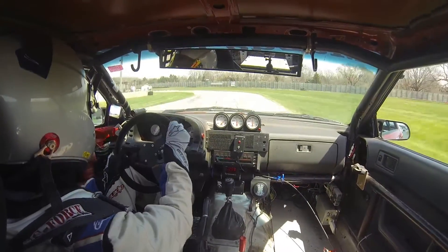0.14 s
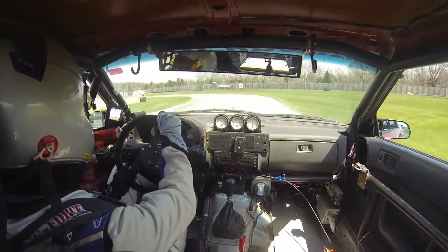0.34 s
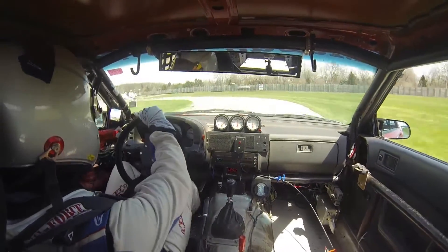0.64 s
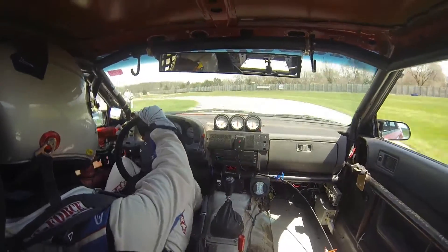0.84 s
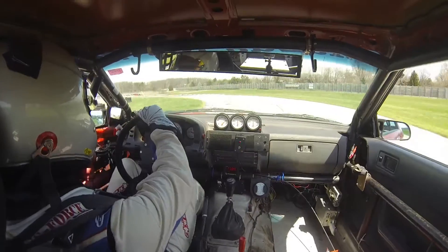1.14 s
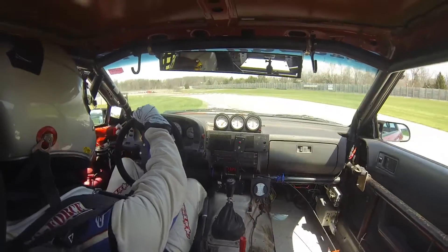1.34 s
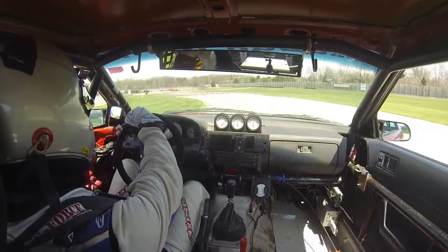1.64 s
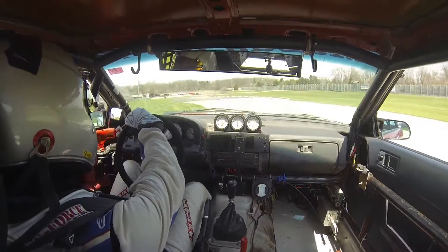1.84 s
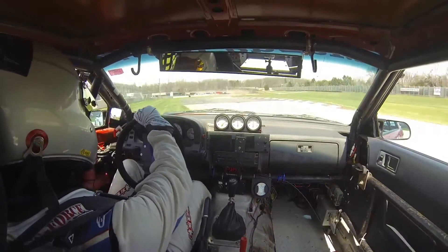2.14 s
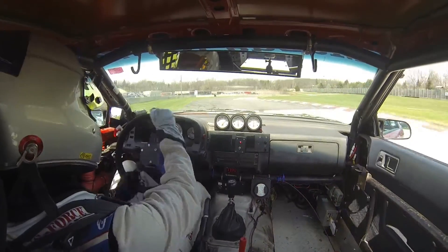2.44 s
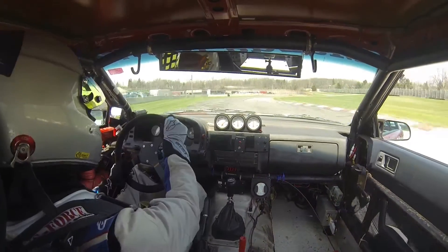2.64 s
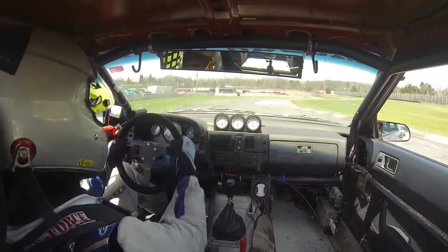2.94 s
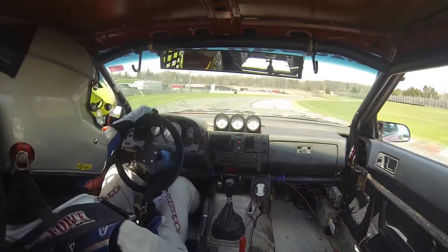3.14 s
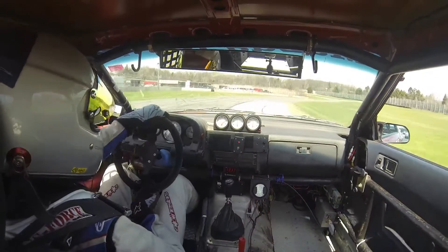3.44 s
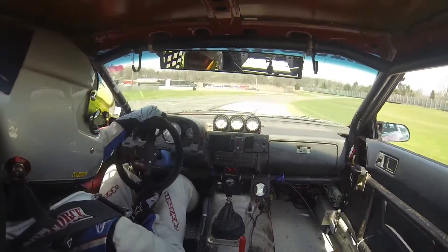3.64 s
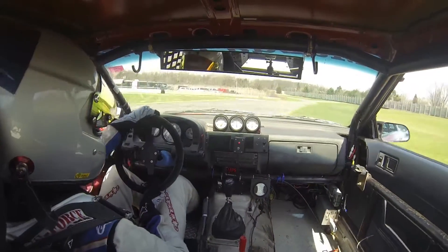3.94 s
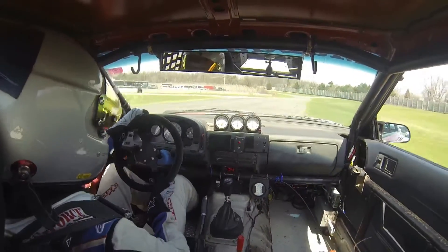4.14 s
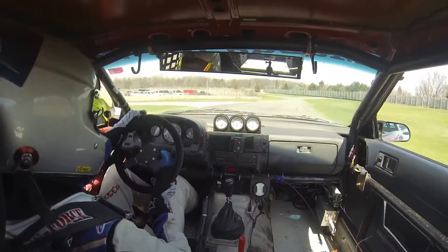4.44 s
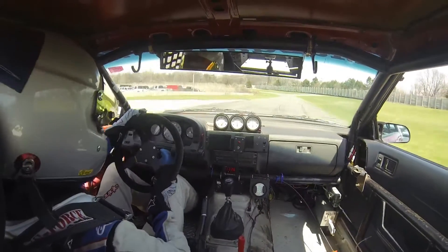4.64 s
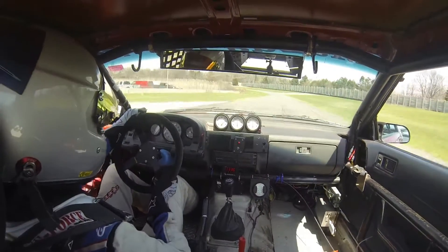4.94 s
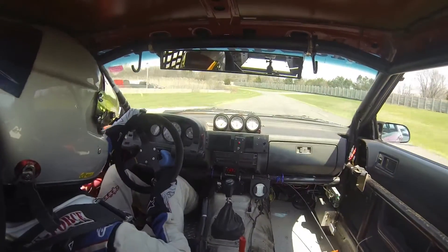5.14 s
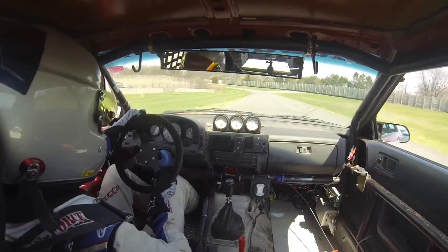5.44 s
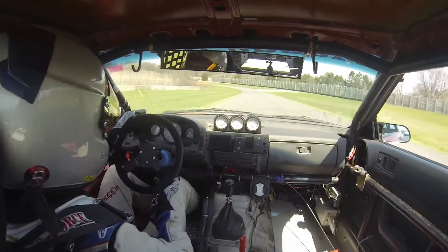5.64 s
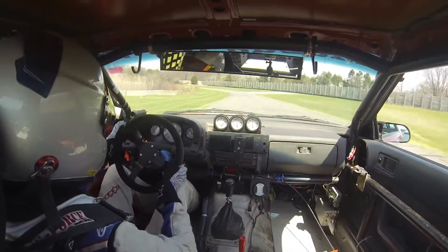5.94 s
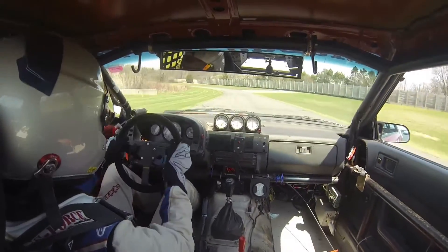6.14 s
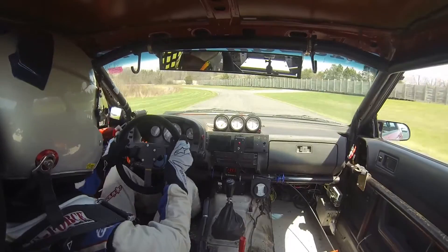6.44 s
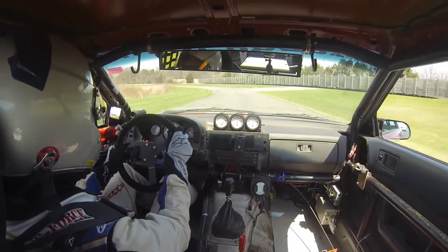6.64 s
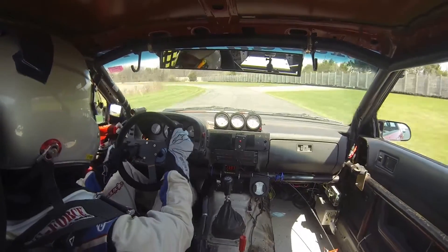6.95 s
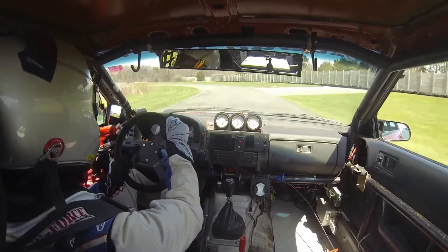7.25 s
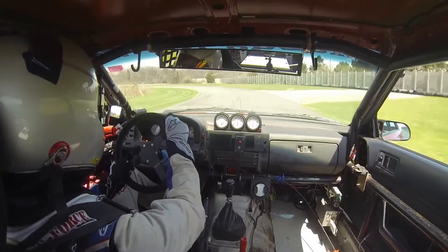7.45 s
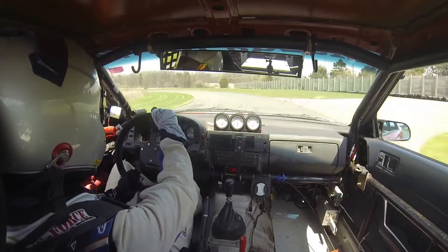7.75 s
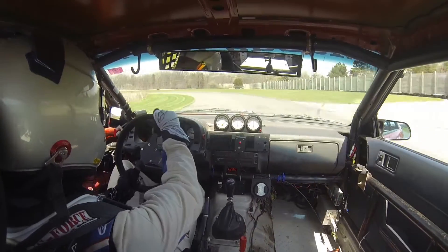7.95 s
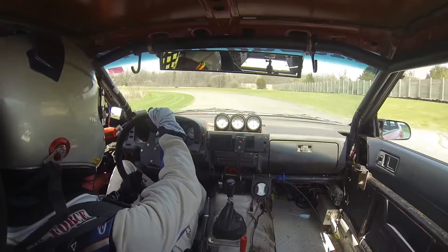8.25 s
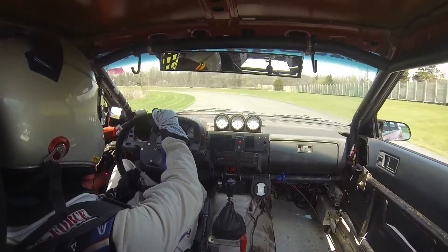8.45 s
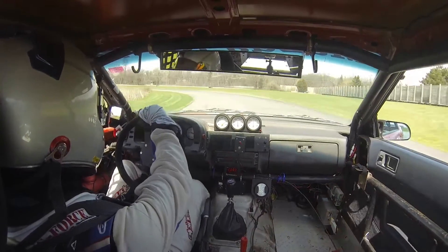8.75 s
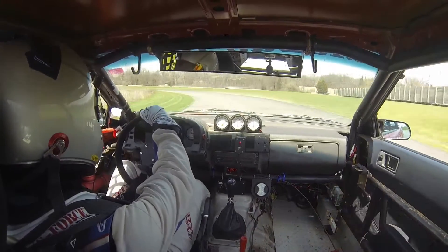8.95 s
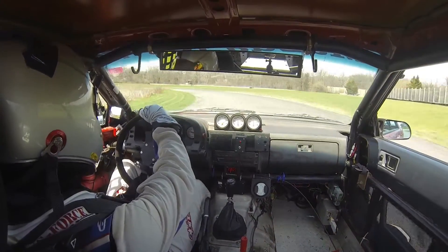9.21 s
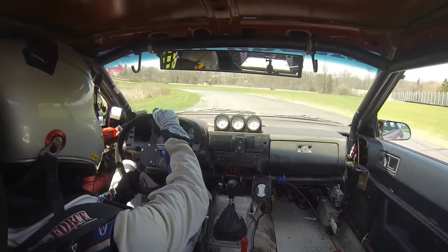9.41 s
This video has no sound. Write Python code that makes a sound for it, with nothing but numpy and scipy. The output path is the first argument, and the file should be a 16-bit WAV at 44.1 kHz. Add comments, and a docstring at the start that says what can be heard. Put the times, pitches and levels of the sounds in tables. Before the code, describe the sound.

A close cabin microphone hears low wind rumble, tyre roar and rattling panels around a raspy race engine. It begins off throttle, popping and sinking in pitch over two soft thumps, then pulls in one long rising drone with slight wavering. At the top it cuts, sags and pops while wind swells, and finally growls back under load, eases for a moment and pulls again.

```python
"""A twin-rotor race engine in a stripped cabin, as a source-filter model of pulse trains and noise.
It first coasts with pops, two shell thumps and loud wind, then pulls up through the revs for over five seconds.
It lifts, the pops return and the wind rises; at last it pulls again, easing briefly in between.
Firing pulses sweep through fixed pipe and cabin resonances, and low shaft orders boom in the shell.
Throughout, filtered noise gives wind and tyre roar, and short clicks give ticking and chatter."""
import sys
import numpy as np
from scipy import signal
from scipy.fft import rfft, irfft, next_fast_len
from scipy.io import wavfile
from scipy.ndimage import uniform_filter1d, map_coordinates

SR = 44100
rng = np.random.default_rng(int(sys.argv[2]) if len(sys.argv) > 2 else 0)


def to_wav(s):
    """Save 16-bit WAV."""
    ch = np.atleast_2d(s).T  # columns
    pcm = np.round(np.clip(ch, -1, 1) * 32767)  # PCM
    wavfile.write(sys.argv[1], SR, pcm.astype(np.int16))


N = 422467  # samples

# Levels are relative: the gains in the functions below also apply.
# wind buffet at the open windows: t/s, level/dB
WIND_LEVEL = [(0, -18), (.95, -15.5), (1.35, -25), (2.9, -24.5), (4.1, -27), (5.4, -25), (5.9, -26.5),
              (6.7, -23), (7.05, -19.5), (7.6, -19), (8.05, -23.5), (8.45, -15.5), (8.6, -26.5),
              (9.35, -18), (9.58, -29)]
# colour of the buffet: f/Hz, level/dB
WIND_SPECTRUM = [(12, -25.5), (24, 3.5), (38, 9.5), (55, 5), (80, -4), (130, -0.5), (200, -15.5),
                 (400, -63.5)]
# tyre and road roar: t/s, level/dB
ROAD_LEVEL = [(0, -22), (.15, -29), (.35, -23.5), (1, -28.5), (1.5, -31), (3, -31.5), (3.8, -33.5),
              (5, -32.5), (6.4, -31), (7.55, -28.5), (7.8, -32.5), (8.3, -28.5), (8.7, -31.5),
              (9.58, -28.5)]
# colour of the roar: f/Hz, level/dB
ROAD_SPECTRUM = [(50, -9.5), (120, -2.5), (230, 5.5), (280, 0), (350, 0), (430, -4), (620, 1), (950, -6.5),
                 (1150, -18), (1900, -18), (2500, -31.5), (3500, -31.5), (5500, -46.5), (8000, -56),
                 (14000, -68)]
# thumps of the body shell over kerbs: t/s, envelope peak level/dB
SHELL_THUMPS = [(.505, -10), (.775, -19)]
# sharp broadband ticks, each with a swell of chatter: t/s, tick level/dB, chatter level/dB
TICKS_AND_CHATTER = [(.031, -28.5, -51), (0.092, -34, -71), (.197, -35, -61), (.431, -43, -62),
                     (.547, -28, -59), (.628, -33, -56), (0.656, -24.5, -52.5), (.694, -35, -62),
                     (0.786, -32, -56), (.879, -30.5, -57), (1.017, -30, -54), (1.198, -37, -46),
                     (1.884, -43, -51.5), (2.097, -37, -64), (3.401, -37, -52), (4.497, -32, -58),
                     (6.9, -44, -54), (7.01, -43, -57), (7.173, -40.5, -65), (7.33, -45, -59),
                     (7.46, -46, -50.5), (7.628, -32, -47), (7.753, -34, -58), (7.881, -41, -56),
                     (8.035, -37.5, -58), (8.214, -39, -71), (8.353, -36, -53), (8.481, -24, -57.5),
                     (8.561, -34, -63), (8.758, -34, -56), (9.147, -31.5, -58), (9.38, -34, -63)]
# colour of the ticks and the chatter: f/Hz, level/dB
RATTLE_SPECTRUM = [(1000, -18.5), (2400, 8), (3500, 10.5), (5500, -2.5), (7400, -4), (8800, -10.5),
                   (11000, -4), (13800, -9.5), (15000, -19)]
# engine speed: t/s, shaft rate/(turns/s)
SHAFT_RATE = [(0.09, 83.5), (0.31, 79.2), (0.79, 74.5), (1.49, 77.6), (2.17, 82.1), (2.36, 84.3),
              (2.99, 86.5), (3.66, 94.0), (4.49, 100.9), (5.67, 112.5), (6.51, 119.8), (6.6, 110.1),
              (6.7, 118.7), (7.31, 101.8), (7.75, 96.6), (8.86, 94.8), (9.33, 92.6), (9.46, 96.5)]
# flares of the revs as the driven wheels go light over crests: t/s, extra rate/(turns/s)
CREST_FLARES = [(1.03, 1.6), (1.85, 0.7), (2.08, 1.4), (2.34, 0.6), (2.61, 1.0), (2.79, 2.1), (3.02, 1.4),
                (3.28, 0.8), (3.85, 1.9), (4.28, 2.9), (4.5, 0.4), (4.7, 1.1)]
# pedal moves, each held until the next: t/s, travel time/s, load/dB, rotor mismatch/dB, rasp/dB,
# hum level/dB at once a turn, at the firing rate, at twice the firing rate
PEDAL_MOVES = [(0, .01, -35, 0, -6, 13.5, 0.5, -1.5), (.88, 0.14, -2.5, 2.5, -5, 0, 0.5, -1.5),
               (1.16, .14, -0.5, 0, 1.5, 0, 0.5, 0), (6.51, 0.038, -25.5, 3.5, -3, 1.5, 1.5, -5),
               (7.58, .06, -29.5, -3, -7.5, 2.5, 1.5, -2), (8.35, 0.086, -3, -7.5, -2, -2, 0.5, 5),
               (8.84, 0.083, -11.5, 0, 0.5, -8, -7.5, 5.5), (9.24, 0.11, -3, -6, 3, -4.5, 2.5, 3.5)]
# the engine comes on song: shaft rate/(turns/s), firing strength/dB, rotor mismatch/dB, rasp/dB
REV_RESPONSE = [(77.1, -6.5, 8.5, 2), (76.8, -7, 6, 4), (81.5, -3, -3, 0), (83.9, -2.5, -1, -1.5),
                (87.6, 2.5, -1.5, 0), (88.8, 3, 3, -2.5), (97.4, 2, -6, -2.5), (104.7, 1.5, 1, 2.5),
                (107.6, 3, 2.5, 2), (112.6, 1, 2, 3), (115.8, 0, 4, 5.5), (120.2, 4, -1, 3)]
# unburnt fuel popping in the pipe: t/s, level/dB
FUEL_POPS = [(0.287, -16), (.346, -14), (.509, -24), (0.783, -19), (.936, -16.5), (6.899, -15),
             (7.176, -18.5), (7.255, -19), (7.336, -32), (7.47, -17.5), (7.538, -12.5), (7.823, -24),
             (7.963, -15), (8.237, -14.5)]
# colour of a pop ahead of the resonances: f/Hz, level/dB
POP_SPECTRUM = [(100, -16), (350, -1), (650, -5), (950, -11), (1400, -12), (2000, -16.5), (3500, -20.5),
                (8000, -40)]
# boom of a low shaft order in the shell, pulling and coasting: f/Hz, level/dB
SHELL_GAIN_PULLING = [(77, -46), (85, -36), (90, -30), (104, -25), (118, -22), (152, -13), (166, -11.5),
                      (177, -18), (197, -15.5), (225, -10.5), (240, -18.5), (303, -24.5), (313, -18.5),
                      (332, -17.5), (345, -13.5), (388, -15.5), (404, -22.5), (425, -31.5), (475, -25.5)]
SHELL_GAIN_COASTING = [(75, -34), (82, -37), (95, -10.5), (104, -12.5), (116, -14), (150, -18.5),
                       (160, -14.5), (190, -25.5), (207, -14.5), (236, -26.5), (310, -35), (390, -37.5),
                       (460, -43.5)]
# resonances and dips of pipe and cabin: f/Hz, width/Hz, level/dB
RESONANCES = [(230, 25, 13), (292.5, 28, -16.5), (381.4, 91, 20), (512.6, 5.7, 6), (570, 15, -1),
              (584, 12, 10), (636.7, 10, 11), (686.6, 54, 12), (783, 46.4, 14.5), (821, 28, -5.5),
              (931.3, 127, 22.5), (1044, 42, 7.5), (1152, 55, 5), (1242.4, 38, 9), (1329, 6.9, 4.5),
              (1486, 10, 2.5), (1530, 55, 7), (1855, 5.7, 10.5), (1994, 131, 14.5), (2136, 120, 5.5),
              (2380, 90, 1.5), (2738, 15, 9), (2933, 43, 4.5), (3173, 75, 9), (3454, 89, 5)]
# spectrum of one firing under those resonances: f/Hz, level/dB
FIRING_SPECTRUM = [(100, -27.5), (200, -17), (450, -30.5), (700, -37), (1100, -40.5), (1500, -50.5),
                   (1750, -47.5), (2400, -62.5), (3200, -64.5), (4200, -71.5), (5500, -81), (9000, -93)]
# what differs between the rotors, against what they share: f/Hz, level/dB
ROTOR_DIFFERENCE = [(230, -16), (300, -13.5), (380, -14.5), (480, -19), (600, -4.5), (700, -8.5),
                    (780, -3.5), (900, 1.5), (1000, -0.5), (1300, 3.5), (2000, 7.5), (3200, 8.5)]
# colour of the turbulent gas let out by a firing: f/Hz, level/dB
PUFF_SPECTRUM = [(400, -27), (950, 9.5), (1400, -4), (2000, -1.5), (2500, -16.5), (3400, -17.5),
                 (5500, -25.5), (8000, -28), (14000, -24.5)]
# treble ringing of the microphone port: f/Hz, level/dB
PORT_RESPONSE = [(8500, 0), (9400, 1.5), (10050, 6), (11000, -2.5), (12500, -3), (13600, -3), (15400, -16)]

TOP_HZ = 15100  # half-amplitude edge of the band limit
SURGE_HZ, SURGE_S = 3.17, .11  # swing rate of a flare, half length to 1/e
COAST_LOAD_DB = -18  # below this load the engine is dragged along by the wheels
THUMP_HZ, THUMP_S = 71, .028  # pitch, time from onset to envelope peak
CHATTER_T60 = 0.61  # s, decay of a swell of chatter by 60 dB
# steady chatter ahead of the common gains; its growth with revs applies when pulling
CHATTER_COAST_DB, CHATTER_PULL_DB, CHATTER_DB_PER_OCTAVE = -62, -57.5, 9.5
CHATTER_REFERENCE_TURNS = 95  # turns/s
# the hum sags after each pop: depth at the loudest pop, delay, half length to 1/e
MISFIRE_DIP_DB, MISFIRE_LAG_S, MISFIRE_S = -7.5, .035, 0.013


def amp(db):
    """Decibels define an amplitude ratio."""
    return 10 ** (np.asarray(db) / 20)


def unit(x):
    """Division by the root mean square normalises the power."""
    return x / np.sqrt(np.mean(x ** 2) + 1e-20)


def along(points, hz):
    """Interpolation on a logarithmic frequency axis follows pitch intervals."""
    f, values = np.transpose(points)
    return np.interp(np.log(hz + 1), np.log(f), values)


def curves(rows):
    """Linear interpolation in time gives one value per sample for each column after t/s."""
    t, *columns = np.transpose(rows)
    return [np.interp(np.arange(N) / SR, t, column) for column in columns]


def wobble(rate):
    """A spline through random knots, rate of them a second, is a band-limited fluctuation."""
    knots = rng.standard_normal(int(N * rate / SR) + 4)
    return map_coordinates(knots, [np.arange(N) * rate / SR])


def coloured(x, level, size=16384):
    """Folding the cepstrum gives the minimum-phase filter whose gain in dB is level(f/Hz)."""
    gain = amp(level(np.fft.rfftfreq(size, 1 / SR)))
    cepstrum = irfft(np.log(gain + 1e-9))
    fold = 1 + np.sign(np.fft.fftfreq(size))
    response = irfft(np.exp(rfft(cepstrum * fold)))
    return signal.fftconvolve(x, response)[:N]


def noise(spectrum):
    """Filtering white noise shapes its power spectrum; the rms is set to 1."""
    return unit(coloured(rng.standard_normal(N), lambda hz: along(spectrum, hz)))


def lowpass(x, edge_hz, order):
    """A real, positive spectral weight removes treble without phase delay."""
    m = next_fast_len(N + SR // 4)
    weight = 1 / (1 + (np.fft.rfftfreq(m, 1 / SR) / edge_hz) ** order)
    return irfft(rfft(x, m) * weight, m)[:N]


def bursts(rows, t60):
    """Exponential decay: the envelope jumps at each (t/s, level/dB) and falls 60 dB in t60 seconds."""
    envelope = np.zeros(N + SR)
    fall = amp(-60 * np.arange(SR // 2) / SR / t60)
    for s, db in rows:
        envelope[round(s * SR):][:len(fall)] += amp(db) * fall
    return envelope[:N]


def body(hz):
    """Superposed resonance curves give the gain in dB of the pipe and cabin."""
    return sum(db / (1 + (2 * (hz - centre) / width) ** 2) for centre, width, db in RESONANCES)


def cabin(x, t60, wet, count=14):
    """Reverberation between bare panels: a drifting echo pattern makes single orders flare and fade."""
    t = np.arange(SR // 10) / SR
    tails = rng.standard_normal((count, len(t))) * amp(-60 * t / t60)
    place = np.linspace(0, count - 1, N)
    echoes = np.zeros(N + len(t))
    for i, tail in enumerate(tails):
        near = np.flatnonzero(np.abs(place - i) < 1)
        faded = x[near] * np.cos(np.pi / 2 * (place[near] - i))  # crossfade between patterns
        part = signal.fftconvolve(faded, tail / np.linalg.norm(tail))
        echoes[near[0]:][:len(part)] += part
    return (x + wet * echoes[:N]) / np.hypot(1, wet)


def wind_and_road():
    """Turbulence and tyre friction radiate broadband noise, with levels set along the drive."""
    buffet = noise(WIND_SPECTRUM)
    # dividing by the running rms leaves the slow swells to the table
    running_rms = np.sqrt(np.abs(uniform_filter1d(buffet ** 2, size=6000)) + 1e-6)
    wind = buffet / running_rms * amp(curves(WIND_LEVEL)[0] + 1)
    road = noise(ROAD_SPECTRUM) * amp(curves(ROAD_LEVEL)[0] + 3.0 + 1.77 * wobble(25))
    return wind + road


def thumps():
    """Impulsive excitation of a damped mode: low swings of the shell swell and die."""
    out = np.zeros(N + SR)
    t = np.arange(SR // 3) / SR
    envelope = (t / THUMP_S * np.exp(1 - t / THUMP_S)) ** 2
    swing = envelope * np.sin(2 * np.pi * THUMP_HZ * t)
    for s, db in SHELL_THUMPS:
        out[round(s * SR):][:len(t)] += amp(db) * swing
    return out[:N]


def ticks(stray_rate=30, stray_db=-38, stray_spread_db=4, wind_slope=0.49):
    """Decaying broadband noise: a sharp tick at each listed time, and random stray ones, louder in strong wind."""
    at = np.flatnonzero(rng.random(N) < stray_rate / SR)  # stray_rate a second on average
    gust_db = curves(WIND_LEVEL)[0]
    stray_levels = stray_db + wind_slope * (gust_db[at] - gust_db.max())
    stray_levels = stray_levels + stray_spread_db * rng.standard_normal(len(at))
    listed = bursts([(s, tick_db) for s, tick_db, _ in TICKS_AND_CHATTER], t60=0.025)
    strays = bursts(zip(at / SR, stray_levels), t60=0.0075)
    return (listed + strays) * rng.standard_normal(N) * amp(-2)


def rattle(speed, load_db, coast, rate=380, spread_db=1.5, clump_db=-1.4, coast_clump_db=3.5, load_slope=1.0):
    """Random click trains: chatter grows with revs and load when pulling, and swells around listed ticks."""
    sizes = amp(spread_db * np.minimum(rng.exponential(size=N), 3) + 1.5 * wobble(70))
    clicks = (rng.random(N) < rate / SR) * sizes  # rate clicks a second on average
    octaves = np.log2(speed / CHATTER_REFERENCE_TURNS)
    pulling_db = CHATTER_PULL_DB + CHATTER_DB_PER_OCTAVE * octaves + load_slope * load_db
    steady_db = coast * CHATTER_COAST_DB + (1 - coast) * pulling_db
    steady = amp(steady_db + (clump_db + coast_clump_db * coast) * wobble(14))
    swell_envelope = bursts([(s, chatter_db) for s, _, chatter_db in TICKS_AND_CHATTER], t60=CHATTER_T60)
    swells = uniform_filter1d(swell_envelope, size=1300)
    level = np.hypot(steady, amp(2.0) * swells) * amp(3.5)
    chatter = unit(cabin(clicks, t60=0.0027, wet=6)) * level
    return coloured(chatter + ticks(), lambda hz: along(RATTLE_SPECTRUM, hz) + 2)


def shaft_speed(waver=.0016):
    """Rotation sets every order's pitch: the revs in turns/s, with a damped flare around each crest."""
    t = np.arange(N) / SR
    flares = 0
    for s, size in CREST_FLARES:
        window = np.exp(-((t - s) / SURGE_S) ** 2)
        flares = flares + size * np.cos(2 * np.pi * SURGE_HZ * (t - s)) * window
    return (curves(SHAFT_RATE)[0] + flares) * (1 + waver * wobble(22))


def pedal():
    """Piecewise-linear control: load, rotor mismatch, rasp and three hum levels, all in dB."""
    rows = [(0, *PEDAL_MOVES[0][2:])]
    for before, (s, travel, *setting) in zip(PEDAL_MOVES, PEDAL_MOVES[1:]):
        rows += [(s, *before[2:]), (s + abs(travel), *setting)]
    return curves(rows)


def coasting(load_db):
    """A smooth power-ratio switch: near 1 with the throttle shut, near 0 under load."""
    return 1 / (1 + amp(load_db - COAST_LOAD_DB) ** 2)


def pops():
    """Combustion noise: short blasts of burning gas rise in about a millisecond and ring the same pipe."""
    flare = uniform_filter1d(bursts(FUEL_POPS, t60=0.073), size=50)
    blasts = flare * rng.standard_normal(N)
    return amp(3.5) * coloured(blasts, lambda hz: along(POP_SPECTRUM, hz) + body(hz))


def boom(angle, speed, coast, hums_db, flutter_db=.5, drift_db=0.68, stagger=0.28):
    """Forced resonance: shaft orders 1, 2 and 4 cross the shell's modes; off the throttle they stumble."""
    t = np.arange(N) / SR
    angle = angle + stagger * coast * wobble(45)  # stagger in radians
    loudest_db = max(db for _, db in FUEL_POPS)
    dips = sum(np.exp(-((t - s - MISFIRE_LAG_S) / MISFIRE_S) ** 2) * amp(db - loudest_db) for s, db in FUEL_POPS)
    sag_db = MISFIRE_DIP_DB * dips
    hum = 0
    for octave, hum_db in enumerate(hums_db):
        order = 2 ** octave
        pulling = amp(along(SHELL_GAIN_PULLING, order * speed))
        dragged = amp(along(SHELL_GAIN_COASTING, order * speed))
        size = (1 - coast) * pulling + coast * dragged
        wave = np.cos(order * angle) if octave < 2 else np.sin(order * angle)
        hum = hum + size * amp(hum_db + drift_db * wobble(14)) * wave
    return hum * amp(sag_db + (flutter_db + 1.3 * coast) * wobble(60))


def rotor(angle, count=80):
    """A harmonic sum in closed form: one sharp pulse a turn from count shaft orders of equal size."""
    half = np.mod(angle, 2 * np.pi) / 2 + 1e-9
    return np.sin((2 * count + 1) * half) / (2 * np.sin(half)) - .5


def dispersed(x, spread):
    """Dispersion in pipe and floor: higher orders arrive later, by up to spread seconds."""
    m = next_fast_len(N + SR // 4)
    hz = np.fft.rfftfreq(m, 1 / SR)
    delay = spread * hz / (hz + 1000)
    phase = 2 * np.pi * np.cumsum(delay) * SR / m  # the integral of group delay over frequency
    return irfft(rfft(x, m) * np.exp(-1j * phase), m)[:N]


def reflected(sound, edge_db, bright_db, bark_db=4, rasp_db=4, treble_db=6):
    """Band-dependent reverberation: bands above 1150 Hz arrive partly by reflection, the treble most."""
    low = lowpass(sound, edge_hz=1150, order=30)
    below_rasp = lowpass(sound, edge_hz=1890, order=24)
    below_treble = lowpass(sound, edge_hz=2276, order=24)
    bark = cabin(below_rasp - low, t60=0.12, wet=0.95, count=16) * amp(bark_db)
    rasp = cabin(below_treble - below_rasp, t60=0.15, wet=0.8, count=16) * amp(rasp_db + edge_db)
    treble = cabin(sound - below_treble, t60=0.15, wet=2.5, count=16) * amp(treble_db + bright_db)
    return low + bark + rasp + treble


def exhaust(angle, speed, pedal_db, uneven_db, edge_db, jitter=0.0066, coast_jitter=.07, scatter_db=0.76,
            treble_slope=0.58):
    """Superposed pulse trains: two rotors fire in turn, and their mismatch adds the odd shaft orders."""
    revs, *columns = np.transpose(REV_RESPONSE)
    strength_db, unlike_db, bright_db = [np.interp(speed, revs, column) for column in columns]
    load_db, mismatch_db = pedal_db + strength_db, uneven_db + unlike_db
    # firings fall out of step when the throttle is shut; jitter in radians
    angle = angle + (jitter + coast_jitter * coasting(pedal_db)) * wobble(170)
    front, rear = rotor(angle), rotor(angle + np.pi)
    # orders 1, 2 and 4 reach the cabin as boom instead
    shared = (front + rear) / 2 - np.cos(2 * angle) - np.cos(4 * angle)
    odd_orders = (front - rear) / 2 - np.cos(angle)
    differing = coloured(odd_orders, lambda hz: along(ROTOR_DIFFERENCE, hz))
    # the sharp edges of the two pulses always differ; only their bulk evens out at times
    bulk = lowpass(differing, edge_hz=1390, order=6)
    pulses = shared + differing + bulk * (amp(mismatch_db + 1.34 * wobble(12)) - 1)
    pulses = pulses * amp(load_db + scatter_db * wobble(190))
    resonant = coloured(pulses, lambda hz: along(FIRING_SPECTRUM, hz) + body(hz))
    sound = dispersed(resonant, spread=.013)
    # each firing also lets out a puff of turbulent gas
    puffs = noise(PUFF_SPECTRUM) * (1 + .5 * np.cos(2 * angle)) * amp(load_db - 39.5)
    treble_db = treble_slope * (bright_db - bright_db.mean())
    return reflected(sound, edge_db + bright_db, treble_db) + puffs


def scene():
    """Linear superposition: the pedal sets the load; one shaft drives exhaust, boom and rattle."""
    speed = shaft_speed()
    angle = 2 * np.pi * np.cumsum(speed) / SR
    load_db, uneven_db, edge_db, *hums_db = pedal()
    coast = coasting(load_db)
    background = wind_and_road() + thumps() + rattle(speed, load_db, coast)
    engine = pops() + boom(angle, speed, coast, hums_db) + exhaust(angle, speed, load_db, uneven_db, edge_db)
    return (background + engine)[None]


def record(dry):
    """Port resonance colours the treble, saturation rounds the highest peaks, a steep low-pass limits the band."""
    heard = coloured(dry[0], lambda hz: along(PORT_RESPONSE, hz))
    rounded = heard / (1 + np.abs(heard / .9) ** 8) ** (1 / 8)
    return lowpass(rounded, TOP_HZ, order=120)[None]


dry = scene()
out = record(dry)
to_wav(out)
```